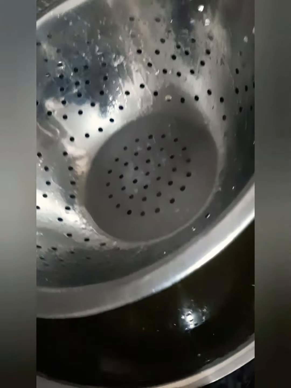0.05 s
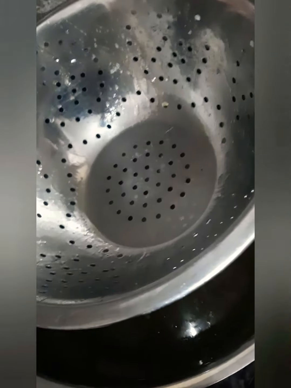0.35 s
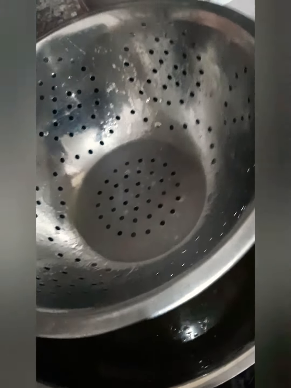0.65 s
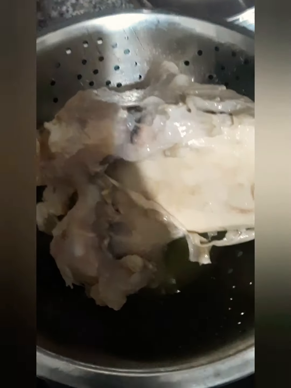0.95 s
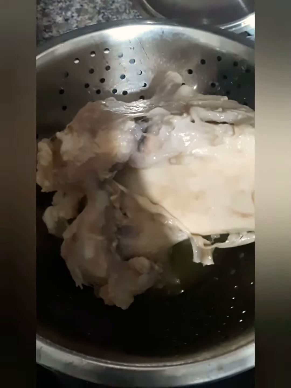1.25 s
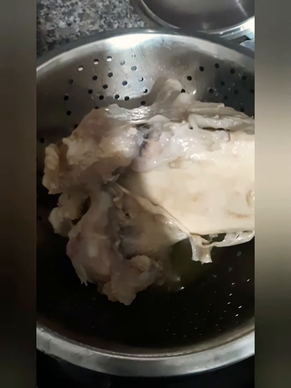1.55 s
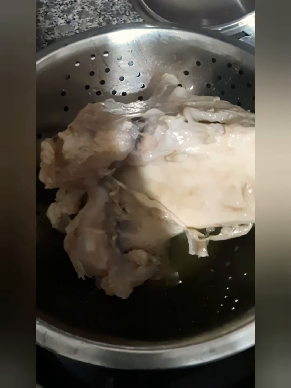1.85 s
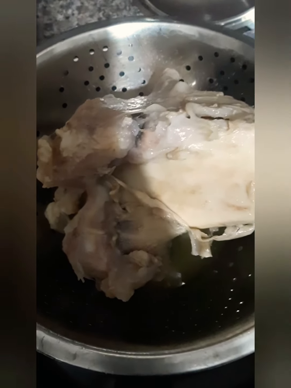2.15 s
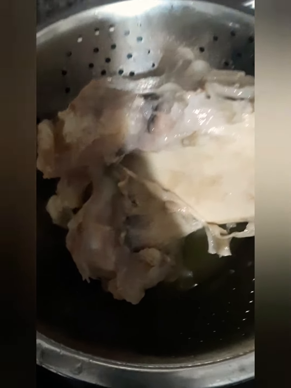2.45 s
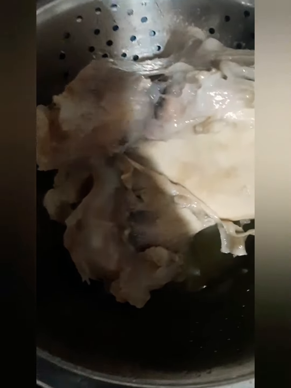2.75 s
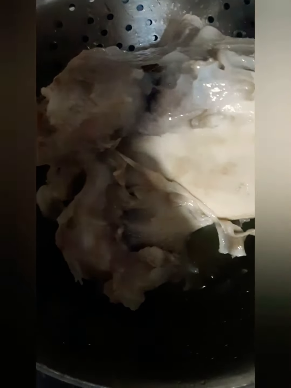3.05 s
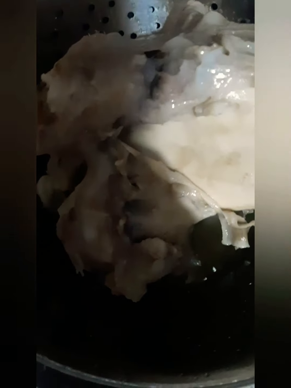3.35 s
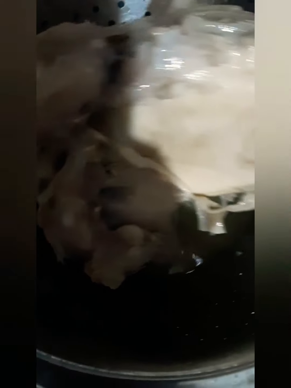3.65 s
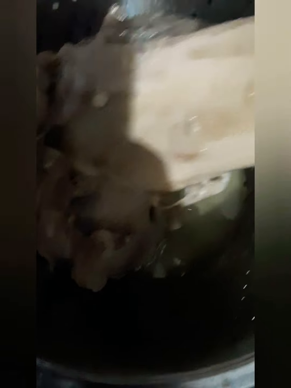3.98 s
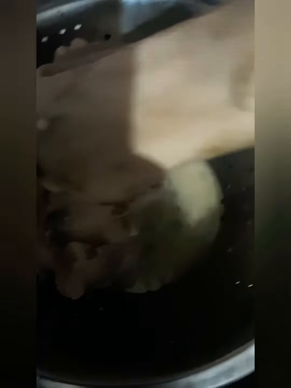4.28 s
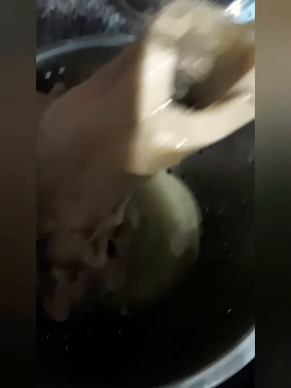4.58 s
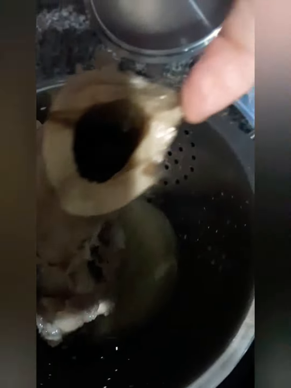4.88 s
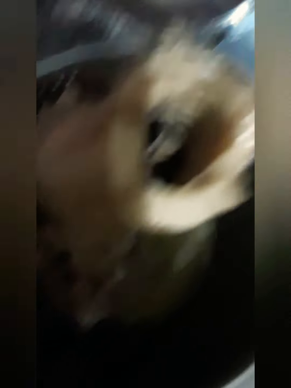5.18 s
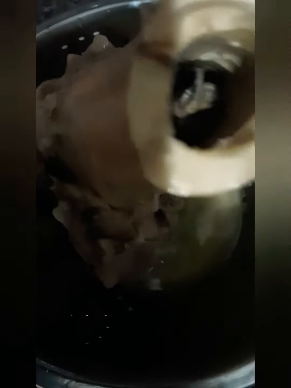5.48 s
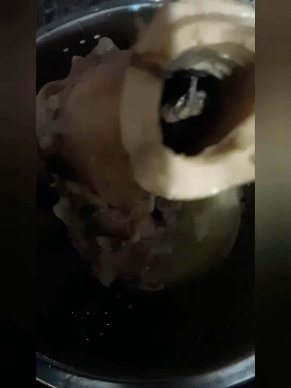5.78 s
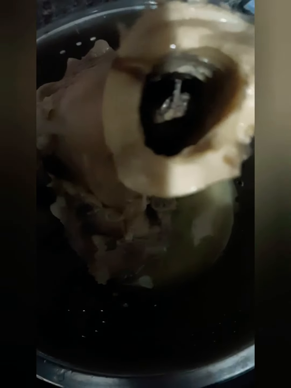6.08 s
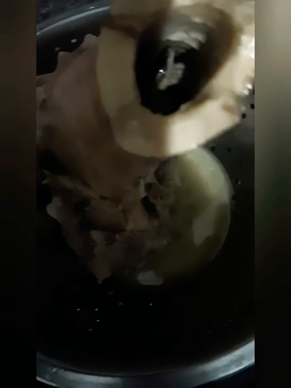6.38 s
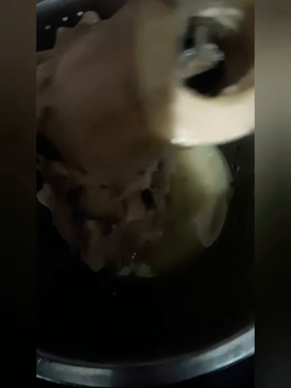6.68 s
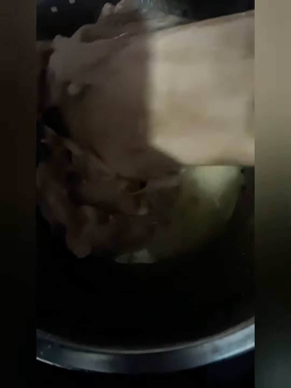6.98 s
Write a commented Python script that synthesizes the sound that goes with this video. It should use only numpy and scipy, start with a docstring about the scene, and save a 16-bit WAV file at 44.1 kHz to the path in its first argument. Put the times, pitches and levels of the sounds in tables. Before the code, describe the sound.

A steel colander clanks, then a wet boiled bone drags and smacks inside it and knocks hard against the metal, over a low hum.

```python
"""A steel colander clanks twice on its pot and rattles, in a hard-walled kitchen with a low appliance hum.
At 0.9 s comes a moment of silence; the hum stays low, then recovers. A big boiled bone is turned over
in the colander: wet meat drags over the steel, peels off with smacks and drips; air pockets resonate.
The bone drops against the metal and sets it ringing, hard at 4.1 s and softly at 6.5 s."""
import sys
import numpy as np
from scipy import signal
from scipy.fft import rfft, irfft, next_fast_len
from scipy.io import wavfile
from scipy.ndimage import uniform_filter1d

SR = 44100
rng = np.random.default_rng(int(sys.argv[2]) if len(sys.argv) > 2 else 0)


def to_wav(sig):
    """Store sig (one row per channel, or 1-D mono) as 16-bit WAV at the path in sys.argv[1].

    Samples outside -1..1 are clipped; the rate is SR.
    """
    pcm = np.clip(np.atleast_2d(sig), -1, 1) * 32767
    pcm = np.round(pcm).astype(np.int16)
    wavfile.write(sys.argv[1], SR, pcm.T)  # frames by channels


N = 314433

# colander hits pot: start_s, contact_s, level_db, tilt_db_per_oct, ring_db, spot (0 rim, 1 wall)
CLANKS = [(0, 0.013, -48.5, -1.5, -66, 0.95), (0.193, 0.01, -26.5, 0.5, -40.5, 0.02),
          (0.571, 0.0077, -26, 3.5, -39, 0.82), (0.579, 0.025, -26.5, -1, -41, .8),
          (0.636, 0.028, -32, 0, -50.5, 1), (0.678, 0.035, -38.5, -1, -47.5, 0.79),
          (0.734, 0.022, -40, -2, -49.5, 0.96)]
# load bumps in colander: start_s, contact_s, level_db, tilt_db_per_oct, ring_db
KNOCKS = [(0.422, 0.014, -41.5, -4.5, -65.5), (0.52, 0.02, -41, -9.5, -59),
          (4.128, 0.0089, -16.5, -0.7, -32.5), (4.133, 0.016, -19.5, 2.14, -20),
          (6.514, 0.02, -40, -10.5, -57), (6.585, 0.012, -56, -13, -65)]
# meat drags over steel: peak_s, build_s, ease_s, level_db, tilt_db_per_oct
DRAGS = [(0.42, 0.047, 0.02, -58.5, -1.5), (0.535, 0.094, 0.025, -52.5, -3), (0.992, .11, 0.065, -56.5, .3),
         (2.23, 0.35, 0.51, -63, 1), (2.64, 0.23, 0.075, -43.5, 0.5), (2.99, .11, 0.18, -35, -0.08),
         (3.45, 0.23, .26, -48.5, 0.7), (3.804, 0.1, 0.036, -57, 1.5), (4.0, 0.091, 0.18, -59, 1.1),
         (4.132, 0.035, 0.012, -39.5, -2), (4.41, 0.11, 0.076, -58.5, -2), (4.74, 0.27, 0.3, -68, -1),
         (4.855, 0.084, 0.13, -54.5, -1.8), (5.464, 0.044, 0.015, -56.5, -1), (6.536, 0.03, 0.033, -47, -6)]
# meat catches and jerks free: start_s, length_s, level_db
SNAGS = [(2.607, 0.032, -32.5), (2.689, 0.021, -32), (2.873, 0.06, -36), (3.414, 0.034, -39.5)]
# meat peels off and lets go: release_s, peel_s, level_db, tilt_db_per_oct
SMACKS = [(1.4, 0.014, -63, -1.5), (2.01, .08, -56.5, -4), (2.095, 0.035, -49.5, 4), (2.238, .005, -52, 1),
          (3.325, 0.0054, -52, 4), (3.598, .005, -55.5, 12), (5.16, 0.067, -55, -0.5),
          (5.403, 0.08, -43.5, 7.5), (6.092, .03, -43, 5), (6.753, 0.029, -49.5, 6),
          (7.085, 0.0048, -69, 6)]
# pot hollow and air pockets in the meat: start_s, length_s, pitch_hz, level_db
PLOPS = [(1.984, 0.026, 598, -51.5), (1.995, 0.0255, 297, -48.5), (3.3, 0.34, 1990, -59.5),
         (4.355, 0.06, 2080, -58.5), (4.526, 0.41, 2210, -71), (4.585, 0.31, 3060, -73),
         (6.096, 0.033, 2340, -57.5), (6.139, .1, 2050, -69.5), (6.516, 0.018, 195, -45),
         (6.52, 0.018, 309, -43), (6.694, 0.087, 1570, -70)]
# modes of the empty colander: pitch_hz, rim_db, wall_db
EMPTY_MODES = [(335, -7, 2.5), (425, -15, 2.5), (625, -11.5, -7.5), (740, -8, -0.5), (853, 3, -7),
               (905, -3, -4), (928, 1.5, -3), (1085, -12.5, -1.5), (1513, 0.5, -4), (1580, -16, 8),
               (1717, -19, -3.5), (1953, -13.5, 5), (2056, -10.5, -6.5), (2120, -0.5, -1.5),
               (2320, -21.5, 2), (2415, 2, -5), (2560, -0.5, -1), (2602, 0, -8), (2960, -5.5, -5),
               (3090, -5, -8), (3415, -3.5, -14), (3650, -13.5, -4), (4170, -17, -16), (4970, -6.5, -4),
               (4950, 2.5, -9.5), (5870, -10.5, -7.5), (6135, -5.5, -6.5), (6100, -5.5, -6.5),
               (6530, -12.5, -7)]
# modes of the loaded colander in its pot: pitch_hz, level_db
LOADED_MODES = [(122, -16), (283, -5), (363, -2), (567, 4), (598, -2.5), (686, -8.5), (775, -6),
                (837, -5.5), (888, 1.5), (1074, -5), (1168, -14), (1270, -13.5), (1349, -6), (1549, 6),
                (1630, -12), (1735, -6.5), (2045, -1), (2324, -8.5), (2546, -15.5), (2826, -9.5),
                (3006, -12.5), (3216, -12.5), (4072, -13.5), (4404, -16), (4866, -13.5)]
# contact spectra: freq_hz, density_db
CLANK_COLOUR = [(20, -35), (60, -2.5), (220, -10), (450, 2), (900, -4.5), (1250, -10), (1550, -2.5),
                (2500, -5), (3200, -7.5), (4400, -11), (5100, -4.5), (6300, -3.5), (8700, -15.5),
                (11000, -13), (16000, -17)]
KNOCK_COLOUR = [(20, -45), (50, -21.5), (85, -9), (170, -19.5), (290, -6), (450, -5.5), (580, -2.5),
                (900, -6.5), (1500, -12.5), (2000, -14.5), (2800, -22.5), (3500, -29.5), (4900, -28.5),
                (6500, -38), (9000, -45.5), (16000, -42.5)]
DRAG_COLOUR = [(82, -45.5), (140, -17), (275, -12), (355, -2.5), (518, -9), (698, -2), (997, -5.5),
               (1060, -6.5), (1510, -3), (2480, -6), (5270, -7), (9000, -14), (14500, -9), (16000, -23.5)]
SMACK_COLOUR = [(200, -19), (900, 7.5), (1500, -2.5), (2200, 9), (3300, -13), (5500, -3.5), (8500, -8.5),
                (11500, -4), (16000, -11.5)]
# kitchen decay: freq_hz, t60_s
ROOM_T60 = [(100, 0.57), (400, 0.31), (1200, 0.41), (3000, 0.4), (7000, 0.37), (15000, 0.33)]
# left-right likeness of the room sound: freq_hz, coherence
COHERENCE = [(60, 1), (130, 0.97), (290, 0.98), (640, 0.21), (1400, 0), (15000, 0)]
# appliance air noise: freq_hz, density_db
AIR_COLOUR = [(25, -35), (55, -17), (70, -20.5), (100, -2.5), (150, -21), (240, -19), (310, -13.5),
              (420, -11), (650, -23), (1100, -33.5), (2000, -37.5), (3400, -48.5), (5200, -40), (8800, -57),
              (13000, -40), (16000, -41.5)]
# appliance hum lines, before hum_gain: centre_hz, width_hz, level_db
HUM_LINES = [(47.7, 3.9, -56.5), (82.2, 6.7, -60.5), (97, 9.3, -61), (119.7, 2, -67.5), (300.4, 2.7, -65.5),
             (314, 33, -55.5), (377, 12, -73.5), (1524, 37, -87)]
# microphone imbalance: freq_hz, left_minus_right_db
BALANCE = [(60, 0), (130, -2.5), (300, -3.5), (1200, -3), (2400, -3.5), (5000, -0.9), (9000, -2),
           (15000, -4)]

SILENCE_S = (0.903, 0.946)


def colander_clanks():
    """Steel on steel; the struck spot decides which modes ring most."""
    out = 0
    for *blow, spot in CLANKS:
        modes = [(hz, np.interp(spot, [0, 1], [rim_db, wall_db])) for hz, rim_db, wall_db in EMPTY_MODES]
        out += blows([blow], CLANK_COLOUR, modes, t60_s=0.42, damping=0.21, rise_s=0.0012, edge=0.63,
                     grit_db=3.5, direct_db=-8, early_db=2.5)
    return out


def bone_knocks():
    """Bone on steel; the loaded colander rings only briefly."""
    return blows(KNOCKS, KNOCK_COLOUR, LOADED_MODES, t60_s=0.19, damping=0.074, rise_s=0.0033, edge=0.28,
                 grit_db=1, direct_db=-13.5, early_db=-3.5)


def meat_drags(snag_tilt_db_per_oct=0.13):
    """Wet meat crackles over the steel as hard as it is pushed; snags jerk it along."""
    out = np.zeros((2, N))
    texture = dict(grit_db=11, direct_db=-9, early_db=-5.5)
    for peak_s, build_s, ease_s, level_db, tilt in DRAGS:
        crackle = contact(push(build_s, ease_s), DRAG_COLOUR, tilt, **texture)
        add(out, peak_s - build_s, gain(level_db) * crackle)
    for start_s, length_s, level_db in SNAGS:
        jerk = contact(touch(length_s, edge=0.15), DRAG_COLOUR, snag_tilt_db_per_oct, **texture)
        add(out, start_s, gain(level_db) * jerk)
    return out


def meat_smacks(smack_s=0.0079, peel_db=-10, fade_s=0.043):
    """Sticky meat sizzles as it peels and smacks as it lets go; the sizzle then fades."""
    out = np.zeros((2, N))
    texture = dict(grit_db=2, direct_db=-13, early_db=-13)
    for release_s, peel_s, level_db, tilt in SMACKS:
        sizzle = contact(push(peel_s, fade_s), SMACK_COLOUR, tilt, **texture)
        smack = contact(touch(smack_s, edge=0.45), SMACK_COLOUR, tilt, **texture)
        add(out, release_s - peel_s, gain(level_db + peel_db) * sizzle)
        add(out, release_s, gain(level_db) * smack)
    return out


def cavity_plops(skirt_db=-26):
    """Each cavity resonates in a narrow band around its pitch."""
    out = np.zeros((2, N))
    for start_s, length_s, hz, level_db in PLOPS:
        band = [(hz / 4, 2 * skirt_db), (hz / np.sqrt(2), skirt_db), (hz, 0),
                (hz * np.sqrt(2), skirt_db), (hz * 4, 2 * skirt_db)]
        plop = contact(touch(length_s, edge=0.34), band, 0, grit_db=2.5, direct_db=-5.5, early_db=1)
        add(out, start_s, gain(level_db) * plop)
    return out


def blows(rows, colour, modes, t60_s, damping, rise_s, edge, **texture):
    """Each blow: a short chatter of contact plus ringing metal."""
    out = np.zeros((2, N))
    for start_s, contact_s, level_db, tilt, ring_db in rows:
        chatter = contact(touch(contact_s, edge), colour, tilt, **texture)
        add(out, start_s, gain(level_db) * chatter)
        add(out, start_s, gain(ring_db) * steel_ring(modes, t60_s, damping, rise_s))
    return out


def steel_ring(modes, t60_s, damping, rise_s):
    """Decaying modes: t60_s at 1 kHz, shorter above; own phase in each channel."""
    t = np.arange(SR * 3 // 4) / SR
    out = 0
    for hz, level_db in modes:
        left_rad, spread_rad = rng.uniform(-np.pi, np.pi, 2)
        phase_rad = left_rad + np.array([[0], [spread_rad * (1 - lookup(COHERENCE, hz))]])
        decay_db = 60 * t / t60_s * (hz / 1000) ** damping
        out += gain(level_db - decay_db) * np.sin(2 * np.pi * hz * t + phase_rad)
    return out * (1 - np.exp(-t / rise_s))


def touch(length_s, edge):
    """Force of a brief contact; edge is the share spent rising and falling."""
    return signal.windows.tukey(int(np.clip(length_s, 0.002, 0.35) * SR), edge)


def push(build_s, ease_s, build_db=17.5, ease_db=18.5, stick_s=0.012, stick_db=-2.16):
    """Force that builds and eases, sticking and slipping on the way."""
    t = np.arange(-build_s, ease_s, 1 / SR)
    grip = np.interp((t + build_s) / stick_s, np.arange(128), rng.standard_normal(128))
    arc_db = np.interp(t, [-build_s, 0, ease_s], [-build_db, 0, -ease_db])
    return gain(arc_db + stick_db * grip) * signal.windows.tukey(len(t), 0.24)


def contact(force, colour, tilt_db_per_oct, grit_db, direct_db, early_db, size=49152, spots=3):
    """Tiny uneven slips at a few spots follow the force, coloured by surfaces and room."""
    noise, strength = rng.standard_normal((2, size))
    strength = np.repeat(np.minimum(strength, 2), 16)[:size]  # 16-sample grains
    grains = noise * gain(grit_db * strength)
    slips = evened(grains[:len(force)] * force)
    spot = rng.integers(0, spots, size)[:len(force)]
    heard = sum(rfft(slips * (spot == k), size) * rfft(kitchen(direct_db, early_db), size)
                for k in range(spots))
    hz = np.fft.rfftfreq(size, 1 / SR)
    octaves = np.log2(np.maximum(hz, 150) / 1000)
    return irfft(heard * minimum_phase(lookup(colour, hz) + tilt_db_per_oct * octaves))


def kitchen(direct_db, early_db, early_s=0.054, size=16384):
    """Room response: direct click, quick echoes off pot and worktop, tail dying band by band."""
    hz, t, bands = signal.stft(irfft(diffuse_noise(size)[1]), SR, nperseg=256)
    decay_db = 60 * t / lookup(ROOM_T60, hz)[:, None]
    tail = signal.istft(bands * gain(-decay_db), SR, nperseg=256)[1]
    early = gain(early_db) * np.exp(-np.arange(tail.shape[1]) / SR / early_s)
    response = evened(tail * (1 + early)) / np.sqrt(size)
    response[:, 0] += gain(direct_db)
    return response


def appliance(air_db=-55):
    """Dull air noise with narrow, wavering hum lines."""
    hz, noise = diffuse_noise(next_fast_len(N, True))
    out = gain(air_db) * evened(irfft(noise * gain(lookup(AIR_COLOUR, hz))))
    for centre_hz, width_hz, level_db in HUM_LINES:
        line = irfft(noise / (1 + (2 * (hz - centre_hz) / width_hz) ** 2))
        out += gain(level_db) * evened(line)
    return out[:, :N] * hum_gain()


def hum_gain(steady_db=-3, low_db=-13, recovery_s=(1.76, 2.71), swell_s=5.42, width_s=0.2, swell_db=3.5):
    """The hum sinks at the silence, stays low, recovers, then swells once."""
    t = np.arange(N) / SR
    level_db = np.interp(t, [*SILENCE_S, *recovery_s], [steady_db, low_db, low_db, steady_db])
    swell = np.exp(-((t - swell_s) / width_s) ** 2)
    return gain(level_db + swell_db * swell)


def diffuse_noise(size):
    """Frequencies and stereo spectra of white noise, alike in the bass only."""
    hz = np.fft.rfftfreq(size, 1 / SR)
    mid, side = rfft(rng.standard_normal((2, size)))
    coherence = lookup(COHERENCE, hz)
    mid *= np.sqrt((1 + coherence) / 2)
    side *= np.sqrt((1 - coherence) / 2)
    return hz, np.array([mid + side, mid - side])


def minimum_phase(shape_db):
    """Causal filter spectrum of this shape, rms 1."""
    log_gain = np.log(gain(shape_db))
    mirrored = np.r_[log_gain, log_gain[-2:0:-1]]
    phase_rad = -signal.hilbert(mirrored).imag[:len(log_gain)]
    return evened(gain(shape_db)) * np.exp(1j * phase_rad)


def gain(db):
    """Decibels to amplitude."""
    return 10 ** (np.asarray(db) / 20)


def evened(x):
    """Scale to rms 1."""
    return x / np.sqrt(np.mean(x ** 2) + 1e-20)


def lookup(table, hz):
    """Interpolate over log frequency."""
    freq_hz, value = np.transpose(table)
    return np.interp(np.log(hz + 1), np.log(freq_hz + 1), value)


def add(mix, start_s, sound):
    """Mix in a stereo sound."""
    part = mix[:, max(0, round(start_s * SR)):][:, :sound.shape[1]]
    part += sound[:, :part.shape[1]]


def pan(x, right_db):
    """Set right level relative to left."""
    return x * gain(np.array([[-right_db], [right_db]]) / 2)


def scene():
    """Clanks, knocks and wet handling over the hum."""
    knocks = pan(bone_knocks(), right_db=0.5)
    meat = meat_drags() + meat_smacks() + cavity_plops()
    clanks = pan(colander_clanks(), right_db=-1.5)
    return clanks + knocks + meat + appliance()


def record(dry, cutoff_hz=15900):
    """More sensitive right microphone, brief silence, low-pass."""
    t = np.arange(N) / SR
    hz = np.fft.rfftfreq(512, 1 / SR)
    balance_db = np.array([[1], [-1]]) * lookup(BALANCE, hz) / 2
    balance_fir = np.fft.fftshift(irfft(gain(balance_db)), axes=1)[:, 1:]
    heard = signal.oaconvolve(dry, balance_fir, "same", axes=1)
    audible = (t < SILENCE_S[0]) | (t > SILENCE_S[1])
    gate = uniform_filter1d(audible.astype(float), size=128)
    lowpass_fir = signal.firwin(511, cutoff_hz, window=("kaiser", 9), fs=SR)
    return signal.oaconvolve(heard * gate, lowpass_fir[None], "same")


dry = scene()
out = record(dry)
to_wav(out)
```